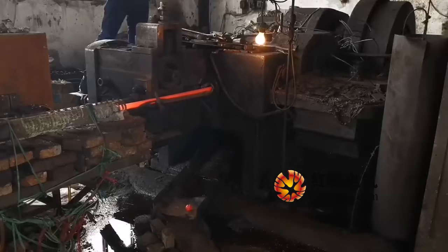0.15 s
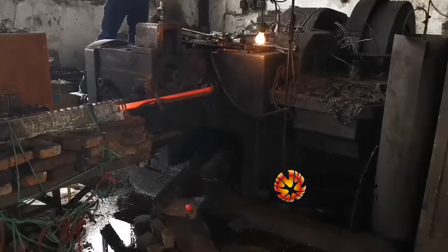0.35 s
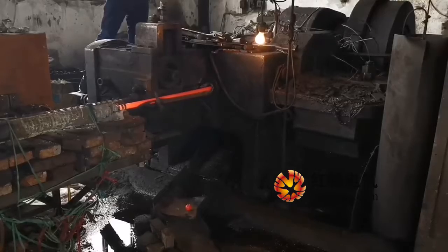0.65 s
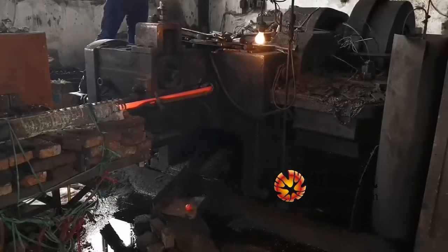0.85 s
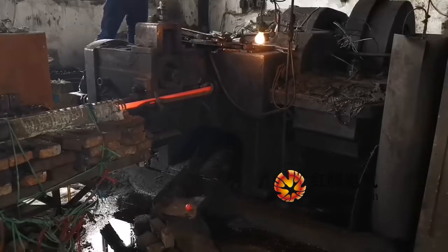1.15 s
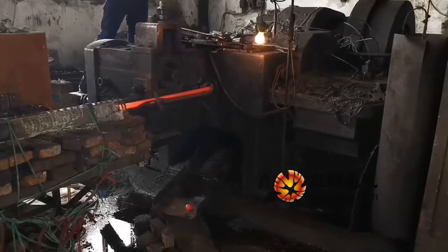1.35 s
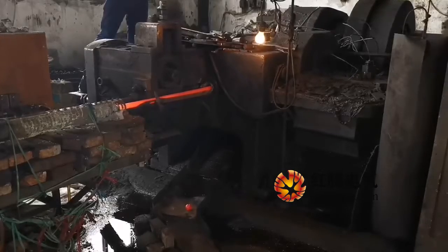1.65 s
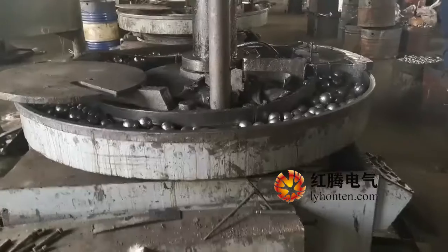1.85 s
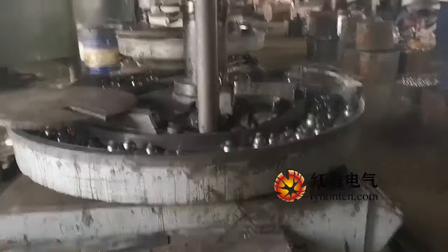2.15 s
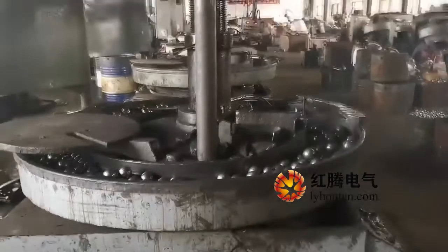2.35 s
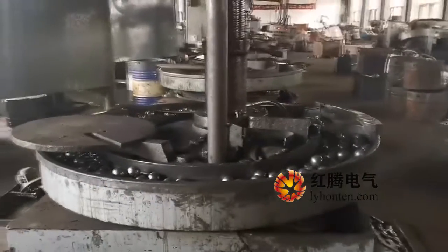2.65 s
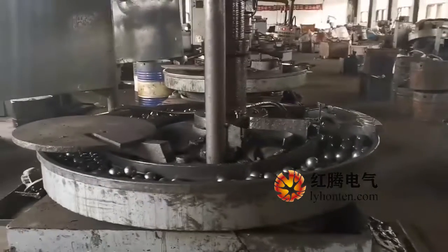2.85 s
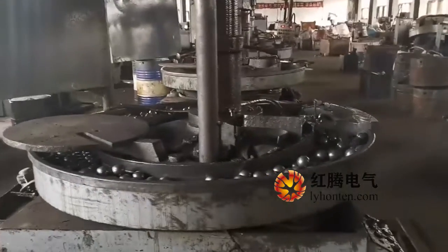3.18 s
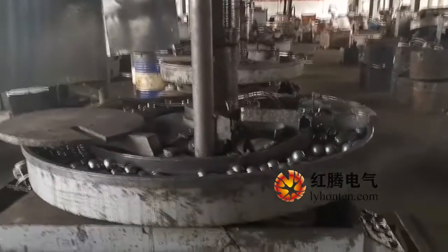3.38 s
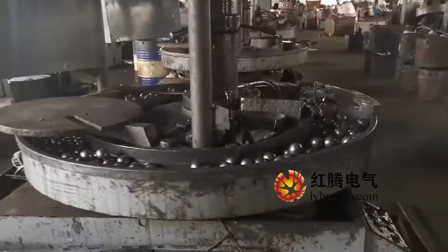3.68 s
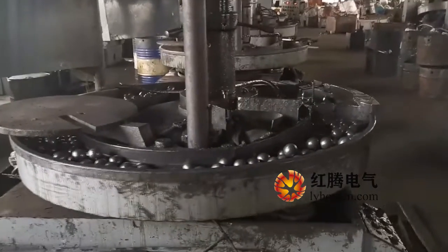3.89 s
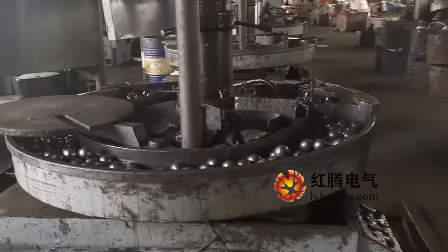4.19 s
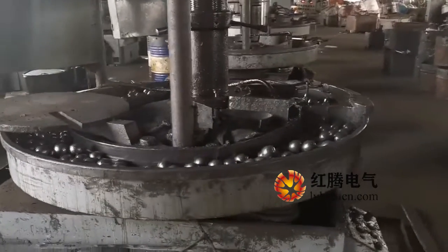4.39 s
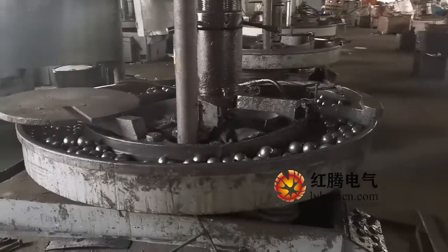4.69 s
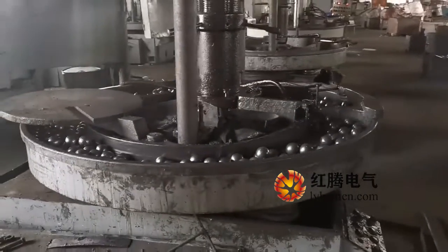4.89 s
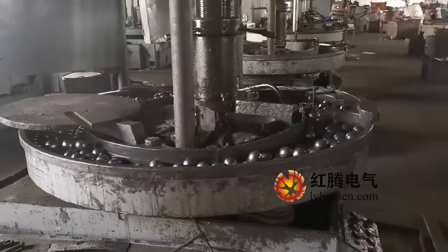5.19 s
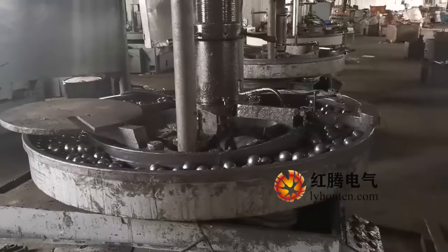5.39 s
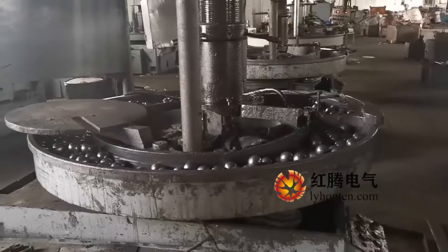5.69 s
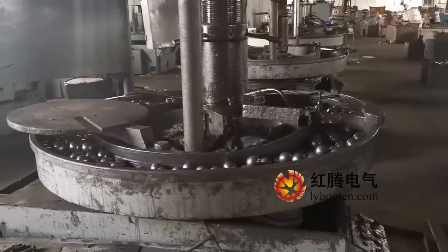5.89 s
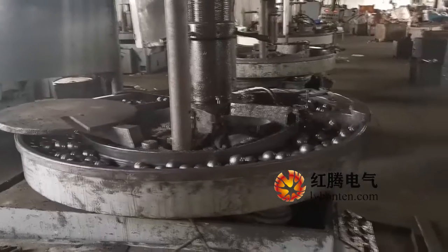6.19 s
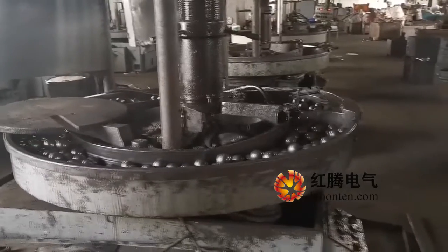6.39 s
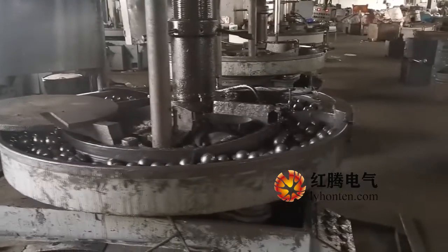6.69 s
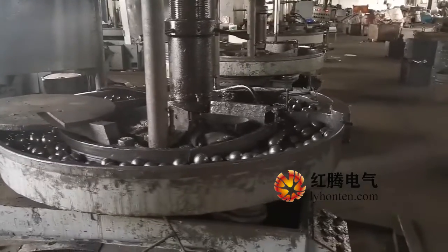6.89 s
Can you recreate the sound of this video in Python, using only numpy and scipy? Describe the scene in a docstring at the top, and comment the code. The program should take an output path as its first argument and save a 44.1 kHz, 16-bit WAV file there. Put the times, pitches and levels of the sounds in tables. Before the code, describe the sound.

In a hard, reverberant factory hall, a heavy rolling mill rumbles and clatters unevenly while hot bar scrapes and briefly squeals and fresh steel balls clank sharply onto a chute. It cuts off to a short silence. Then a ball grinder starts at once, already running: countless steel balls churn, click and knock on an iron pan over a low drive hum. Stereo microphone, fairly close to each machine.

```python
"""Steel-ball works: rolling mill, then ball grinder

Two machines in a hard hall, one after the other with a short silence between, built from random contact
forces that ring coloured, reverberant noise bursts. A skew rolling mill rumbles and clatters on a hot bar,
which scrapes and squeals while fresh balls clank down the chute. Then balls churn in the iron pan of a
grinder over a low drive hum, clicking together, drumming on the floor and knocking on the rim."""
import sys
import numpy as np
from scipy import signal
from scipy.fft import rfft, irfft
from scipy.io import wavfile

SR = 44100
rng = np.random.default_rng(int(sys.argv[2]) if len(sys.argv) > 2 else 0)


def unload_wav(signal):
    """Save mono or channel-first audio to the path in sys.argv[1] as 16-bit WAV at rate SR, clipped to [-1, 1]."""
    wavfile.write(
        sys.argv[1],
        SR,
        np.round(np.clip(np.atleast_2d(signal).T, -1, 1) * 32767).astype(np.int16),
    )


N = 310464

MILL_SPAN, GRINDER_SPAN = (0, 1.825), (2.205, 7.04)  # start and end in seconds
LEAD = SR // 4  # samples for which a machine runs before it is heard
SIZE = 2 ** 15  # samples in the sound of one contact
HZ = np.arange(SIZE // 2 + 1) * SR / SIZE
AGE = np.arange(SIZE) / SR  # seconds since the contact


def undb(db):
    """Decibels to gain."""
    return 10 ** (np.asarray(db) / 20)


def unit(x):
    """Scale to rms 1."""
    return x / np.sqrt(np.mean(x ** 2))


def fade(t60):
    """Envelope that falls 60 dB in t60 seconds."""
    return np.exp(-np.log(1000) * AGE / t60)


def times(span):
    """Sample times in seconds of a machine, from a little before it is heard."""
    return np.arange(round(span[0] * SR) - LEAD, round(span[1] * SR)) / SR


def curve(table, t):
    """A level in dB drawn as straight lines through time."""
    seconds, db = np.transpose(table)
    return np.interp(t, seconds, db)


def effort(table, t):
    """A level curve as dB above its own average."""
    db = curve(table, t)
    return db - db.mean()


def swell(t, start, length, attack, release):
    """Rise in a straight line centred on start, hold, then die away exponentially."""
    rise = np.clip((t - start) / attack + 0.5, 0, 1)
    decay = np.exp(-np.maximum(t - start - length, 0) / release)
    return rise * decay


def rubbing(table, t, attack, release):
    """Level in dB of a run of scrapes or squeals."""
    amplitude = sum(undb(db) * swell(t, start, length, attack, release) for start, length, db in table)
    return 20 * np.log10(1e-9 + amplitude)


def gains(points):
    """(Hz, dB) points as a gain at every frequency."""
    hz, db = np.transpose(points)
    return undb(np.interp(np.log(HZ + 1), np.log(hz), db))


def colour(points):
    """Minimum-phase frequency response through (Hz, dB) points, by folding the cepstrum."""
    cepstrum = irfft(np.log(gains(points)), SIZE)
    cepstrum[1:SIZE // 2] *= 2
    cepstrum[SIZE // 2 + 1:] = 0
    return np.exp(rfft(cepstrum))


def resonances(modes):
    """Frequency response of (Hz, width in Hz, dB) resonances side by side."""
    return sum(undb(db) * 1j * HZ * width / (hz ** 2 - HZ ** 2 + 1j * HZ * width) for hz, width, db in modes)


# A blow is too soft to ring the iron fully in the high treble.
# Each row: frequency in Hz, gain in dB.
SOFT_CONTACT = [(5500, -1.5), (11000, -22.5)]


def detuned(modes, share):
    """Resonances as one place of contact excites them, each off its pitch by a random share."""
    shifts = 1 + share * rng.standard_normal(len(modes))
    shifted = [(hz * shift, width, db) for (hz, width, db), shift in zip(modes, shifts)]
    return gains(SOFT_CONTACT) * resonances(shifted)


def spot_colour(patchy_db=3, step_hz=300):
    """Each place of contact favours a few pitches of its own, less so below 1500 Hz."""
    hz = np.arange(0, SR, step_hz)
    patches = np.clip(rng.standard_normal(len(hz)), -2, 2)
    db = patchy_db * patches * np.minimum(hz / 1500, 1)
    return colour(np.transpose([hz + 1, db]))


def through(x, response):
    """Filter a short sound by a frequency response."""
    return irfft(rfft(x) * response)


def diffuse(spacing_m=0.13, likeness=0.99, sound_speed=343):
    """Noise from all sides at two ports: alike in the bass, nearly unrelated in the treble."""
    alike = likeness * np.sinc(2 * HZ * spacing_m / sound_speed)
    mid, side = through(rng.standard_normal((2, SIZE)), np.sqrt([1 + alike, 1 - alike]))
    return np.array([mid + side, mid - side])


def blow(t60, direct_db, hall_db, lag):
    """One contact: a direct tick (left about lag samples late), the iron's dense ring, the hall's tail."""
    field, ring = diffuse(), fade(t60)
    # the hall decays at 60 dB per second and is also tapered to silence at the end of the sound
    hall = (fade(1) - ring) * (1 - AGE / AGE[-1])
    arrival = 10 + np.array([[1], [-1]]) * (lag + rng.normal(0, 1)) / 2
    tick = unit(np.sinc(AGE * SR - arrival))
    return unit(field * ring) + undb(hall_db) * unit(field * hall) + undb(direct_db) * tick


def contacts(t, rate, spread_db, count=8):
    """Random impulses, rate a second over count spots; spread_db scales their uneven hardness."""
    chance = rng.random((count, len(t)))
    share = rate / count / SR
    spot, when = np.nonzero(chance < share)
    hardness = np.minimum(-np.log(chance[spot, when] / share), 4)
    forces = np.zeros(chance.shape)
    forces[spot, when] = undb(spread_db * hardness) * (-1) ** when
    return forces / np.sqrt(count * np.mean(forces ** 2))


def rattle(forces, db, response, t60, direct_db, hall_db, lag):
    """Contact forces at a moving level ring the iron; one response serves all spots, or one each."""
    gain, out = undb(db), 0
    for force, shape in zip(forces, np.broadcast_to(response, (len(forces), len(HZ)))):
        answer = unit(through(blow(t60, direct_db, hall_db, lag), shape * spot_colour())) / np.sqrt(SIZE)
        out = out + signal.oaconvolve([force * gain], answer, axes=1)[:, :len(force)]
    return out


def ping(hz, t60, scatter=0.03):
    """Two touching balls ring briefly at close pitches, at unrelated phases in the two ports."""
    other_hz = hz * (1 + scatter * rng.standard_normal())

    def ring(pitch):
        return np.sin(2 * np.pi * (pitch * AGE + rng.random((2, 1))))

    onset = 1 - fade(0.0022)
    return (ring(hz) + 0.5 * ring(other_hz)) * fade(t60) * onset


def strikes(table, t, bright, body, modes, t60, direct_db, hall_db, lag, ring_db, clink_t60):
    """Single hard blows: the ball's crack and clink, a lower clack, and the ring of what it hits."""
    out = np.zeros((2, len(t) + SIZE))
    crack_colour, clack_colour = colour(bright), colour(body)
    for seconds, db, body_db, mode_db, clink_hz, clink_db in table:
        responses = np.array([crack_colour, clack_colour, detuned(modes, 0.025)])[:, None]
        parts = through(blow(t60, direct_db, hall_db, lag), responses * spot_colour())
        crack, clack, ring = (part / abs(part).max() for part in parts)
        clink = undb(clink_db) * ping(clink_hz, clink_t60)
        sound = crack + undb(body_db) * clack + undb(mode_db + ring_db) * ring + clink
        start = int((seconds - t[0]) * SR)
        out[:, start:start + SIZE] += undb(db) * sound
    return out[:, :len(t)]


def heard(x, span, lean):
    """Lean a machine left or right by frequency and keep it for its span, with a 128-sample fade-out."""
    ports = irfft([colour([(hz, side * db / 2) for hz, db in lean]) for side in (1, -1)])
    placed = signal.oaconvolve(x, ports, axes=1)[:, LEAD:x.shape[1]]
    closing = np.minimum(np.arange(placed.shape[1])[::-1] / 128, 1)
    return np.pad(placed * closing, ((0, 0), (round(span[0] * SR), N)))[:, :N]


# How hard the rolls work the bar; only the rise and fall about the average counts.
# Each row: time in seconds, level in dB.
MILL_LOAD = [(0.0, -31), (0.166, -39), (0.258, -33), (0.335, -55.5), (0.44, -37), (0.54, -31.5),
             (0.65, -28.5), (0.81, -27.5), (1.0, -34), (1.34, -35), (1.408, -30.5), (1.52, -34),
             (1.67, -28), (1.82, -36.5)]


def mill_load(t):
    """Extra load of the rolls, in dB above the average."""
    return effort(MILL_LOAD, t)


# Resonances of the mill's stand. Each row: frequency in Hz, width in Hz, level in dB.
STAND_MODES = [(144, 25, 3), (269, 13, -20), (383, 24, -7), (850, 21, -2), (1330, 30, -8.5),
               (2580, 46, -13), (5800, 25, -4)]


def mill_stand():
    """The stand passes every force on and adds its own resonances."""
    return 1 + resonances(STAND_MODES)


# Colour of the shaken frame. Each row: frequency in Hz, relative level in dB.
FRAME_COLOUR = [(15, -50), (25, -20.5), (96, -11), (141, -10.5), (189, -8.5), (263, -2.5), (339, -10),
                (408, -9), (600, -21.5), (780, -21.5), (1320, -120)]


def frame_rumble(t, load, stand):
    """Jolts of the rolls shake the heavy frame, whose low rumble follows the load closely."""
    jolts = contacts(t, rate=1000, spread_db=1.0)
    response = colour(FRAME_COLOUR) * stand
    return rattle(jolts, -32.5 + 0.85 * load, response, t60=0.0684, direct_db=-2.5, hall_db=-3, lag=-0.23)


# Colour of the rolls, also the lower clack of a ball on the chute.
# Each row: frequency in Hz, relative level in dB.
ROLLS_COLOUR = [(290, -28), (500, -8), (726, -6), (912, -8.5), (1740, -9), (2870, -11), (4400, -21),
                (5720, -53.5), (9680, -120)]


def roll_clatter(bites, load, stand):
    """The rolls bite the bar and clatter in the middle range, only gently louder under load."""
    response = colour(ROLLS_COLOUR) * stand
    return rattle(bites, -31 + 0.23 * load, response, t60=0.1, direct_db=-17, hall_db=-0.5, lag=-0.5)


# Bright colour of the steel, in the scrapes and in the crack of a ball on the chute.
# Each row: frequency in Hz, relative level in dB.
STEEL_COLOUR = [(2350, -6.5), (4000, -11.5), (4230, -17), (4750, 2.5), (5450, 1), (6580, -3.5), (7940, 2.5),
                (9020, -6.5), (10000, -17.5), (11600, -20), (12700, -30.5), (13900, -29.5), (15000, -48.5)]
# The bar catches in its guide. Each row: start in seconds, length in seconds, level in dB.
SCRAPES = [(0.0, 0.13, -36.5), (0.249, 0.024, -30), (0.318, 0.016, -41.5), (0.553, 0.061, -35.5),
           (0.65, 0.082, -37), (0.893, .04, -38), (1.098, 0.034, -35.5), (1.232, 0.009, -29),
           (1.387, 0.13, -33), (1.546, .02, -37), (1.73, 0.041, -36.5)]


def guide_scrape(t, bites, load, stand):
    """The bar grates in its guide at a nearly steady low level and catches in scrapes."""
    guide_db = -40.5 + 0.093 * load
    db = np.maximum(guide_db, rubbing(SCRAPES, t, attack=0.0081, release=0.037))
    response = colour(STEEL_COLOUR) * stand
    return rattle(bites, db, response, t60=0.045, direct_db=-5.0, hall_db=-14.0, lag=-0.55)


# Balls dropping on the chute. Each row: start in seconds, crack level in dB before a common gain, then
# clack in dB and chute ring in dB against the crack (the ring before a common trim),
# clink pitch in Hz, clink in dB against the crack's peak.
CLANKS = [(0.0024, -23.5, 3, -2.5, 7550, -22), (0.09, -28.5, 5, 3.5, 7450, -18),
          (0.1659, -25.5, -16, -23.5, 8300, -9), (0.2542, -24, -11, -3, 7600, -14),
          (0.274, -25, -16, -4, 7980, -4), (0.3252, -27, -10, -13, 7600, -12),
          (0.4048, -20.5, -8, -20, 7655, -20.5), (0.4085, -22.5, -9, -25, 7520, -14),
          (0.6, -33.5, 10, 3, 7700, -16), (0.627, -33, 8, 1, 7700, -16), (0.6363, -20, -11, -22, 7800, -13),
          (0.672, -28, -10, -24, 5650, -3), (0.9244, -35.5, 15, 3, 7700, -10),
          (0.9889, -27, -11.5, -24, 8200, -7), (1.0973, -25.5, 1, -14, 7750, -8),
          (1.2307, -22, -7.5, -10, 8100, -9), (1.238, -25, 1.5, -7.5, 7740, -6),
          (1.291, -25, -3.5, -27, 7740, -9.5), (1.3585, -30, 1.5, -24.5, 7700, -18),
          (1.405, -29, 6.5, -13.5, 8040, -10.5), (1.473, -29.5, 0, -10, 5200, -3),
          (1.69, -31.5, -7, -17.5, 8300, -8), (1.739, -27.5, 7, -11, 5100, -6),
          (1.7715, -22, -17, -22.5, 7500, -11), (1.8102, -37, -6, -12.5, 8100, 5.5)]
# Resonances of the chute. Each row: frequency in Hz, width in Hz, level in dB.
CHUTE_MODES = [(2090, 31, -0.5), (2460, 65, 0), (2770, 140, 6), (3320, 50, -2), (3480, 42, -1.5),
               (5770, 16, -9.5), (6700, 20, -18.5)]


def chute_clanks(t):
    """Finished balls hit the chute with a short, hard tick, and the chute rings."""
    return undb(5) * strikes(CLANKS, t, STEEL_COLOUR, ROLLS_COLOUR, CHUTE_MODES, t60=0.055, direct_db=-9,
                             hall_db=-2.5, lag=-0.41, ring_db=1, clink_t60=0.06)


# The bar slips between the rolls. Each row: start in seconds, length in seconds, level in dB.
SQUEALS = [(0.005, .03, -29), (.085, .04, -50), (.266, 0.017, -30.5), (.322, 0.023, -32),
           (.36, 0.031, -46.5)]
# What the squeal rings with. Each row: frequency in Hz, width in Hz, level in dB.
SQUEAL_MODES = [(2230, 45, -1), (2530, 61, 2.5), (2760, 50, -1.5), (2845, 67, 1), (3130, 90, -6),
                (3660, 40, -11), (4620, 31, -5), (5800, 37, -3)]


def bar_squeal(t, bites):
    """The slipping bar squeals: the bites of the rolls excite a cluster of resonances."""
    db = rubbing(SQUEALS, t, attack=0.007, release=0.034)
    return rattle(bites, db, resonances(SQUEAL_MODES), t60=0.069, direct_db=-3, hall_db=1, lag=-0.55)


# Stereo lean of the mill. Each row: frequency in Hz, left minus right in dB.
MILL_LEAN = [(60, 4), (110, 3.5), (200, 2.5), (370, 4), (690, 3), (1270, 6), (2340, 0), (4320, 3.5),
             (7950, 2.5), (14600, -3)]


def mill():
    """The rolls bite the bar and shake the frame; the bar scrapes and squeals; balls hit the chute."""
    t = times(MILL_SPAN)
    load, stand = mill_load(t), mill_stand()
    bites = contacts(t, rate=1400, spread_db=0.5)
    machine = frame_rumble(t, load, stand) + roll_clatter(bites, load, stand)
    bar = guide_scrape(t, bites, load, stand) + bar_squeal(t, bites)
    return heard(machine + bar + chute_clanks(t), MILL_SPAN, MILL_LEAN)


# How briskly the balls circulate; only the rise and fall about the average counts.
# Each row: time in seconds, level in dB.
CHURN = [(2.21, -29.5), (2.33, -32.5), (2.52, -33.5), (2.63, -36), (2.77, -34), (3.0, -36), (3.5, -32),
         (3.75, -33.5), (4.35, -30), (5.5, -29.5), (5.7, -32), (5.95, -31), (6.5, -33), (7.03, -30)]


def briskness(t):
    """Extra churning of the balls, in dB above the average."""
    return effort(CHURN, t)


# The balls bunch up and shove along the wall; each part of the grinder scales the rise in its own way.
# Each row: start in seconds, length in seconds, unscaled rise in dB.
SURGES = [(2.425, .05, 0), (3.434, 0.13, 3), (3.553, 0.048, 3), (3.995, 0.013, 6), (4.316, 0.044, 2),
          (4.492, 0.06, 2.5), (4.593, 0.06, 3.5), (5.228, 0.029, 3), (5.544, 0.064, 2), (5.817, 0.061, 3),
          (5.945, 0.049, 4), (6.016, 0.022, 3), (6.313, 0.034, 3.5), (6.407, 0.015, 2.5), (6.54, 0.02, 4.5),
          (6.619, 0.029, 6)]


def bunching(t, slack_share=0.3, slack_s=0.081):
    """Rise in dB before scaling: each surge pushes up, then the balls lie loose and quieter."""
    attack, release = 0.0044, 0.0087  # seconds
    rise = 0
    for start, length, db in SURGES:
        push = swell(t, start, length, attack, release)
        slack = swell(t, start + length + release, slack_s, attack, release)
        rise = rise + db * (push - slack_share * slack)
    return rise


# Resonances of the grinder's pan. Each row: frequency in Hz, width in Hz, level in dB.
PAN_MODES = [(151, 21, -9), (194, 16, -11), (253, 24, -7), (946, 110, -6), (1350, 44, -3), (3560, 59, -6),
             (4204, 20, 6.5), (6300, 22, -1), (7440, 96, -6), (8040, 60, -12)]


def pan_iron():
    """The pan passes every force on and adds its own resonances."""
    return 1 + resonances(PAN_MODES)


def wall_iron(spots):
    """The same pan touched along its wall, slightly detuned at each spot."""
    return 1 + np.array([detuned(PAN_MODES, 0.012) for _ in range(spots)])


# Level of the drive under the pan. Each row: time in seconds, level in dB.
DRIVE_LEVEL = [(2.21, -49), (2.61, -55), (3.61, -47), (3.75, -63), (3.94, -45), (5.3, -46.5), (5.34, -54),
               (7.03, -46.5)]
# Colour of its hum. Each row: frequency in Hz, relative level in dB.
DRIVE_COLOUR = [(15, -24), (25, -27.5), (75, 3), (112, -4.5), (130, -1.5), (170, -24), (290, -120)]


def drive_hum(t, bumps):
    """Dense bumps through a low, narrow colour blur into the hum of the drive."""
    return rattle(bumps, curve(DRIVE_LEVEL, t), colour(DRIVE_COLOUR), t60=0.15, direct_db=3.0, hall_db=1.0,
                  lag=4)


# Colour of the pan's base. Each row: frequency in Hz, relative level in dB.
BASE_COLOUR = [(65, -48.5), (110, -13.5), (194, -8), (221, -5), (252, -4), (328, -3), (403, -4.5),
               (499, -6.5), (600, -28), (780, -42), (1320, -120)]


def base_rumble(bumps, brisk, surge_db, pan):
    """Balls bump the base of the pan, which rumbles and feels only part of each surge."""
    db = -36 + 0.6 * brisk + 0.32 * surge_db
    return rattle(bumps, db, colour(BASE_COLOUR) * pan, t60=0.052, direct_db=1.5, hall_db=-3, lag=7.7)


# Level of the floor's drumming. Each row: time in seconds, level in dB.
DRUMMING = [(2.21, -42), (2.55, -47), (2.65, -44), (3.05, -49), (3.44, -36), (3.8, -44), (4.05, -34),
            (4.35, -39), (4.55, -36), (5.2, -38), (5.45, -44), (5.95, -34), (6.1, -42), (7.03, -39)]
# Resonances of the pan's floor. Each row: frequency in Hz, width in Hz, level in dB.
FLOOR_MODES = [(369, 31, 1.5), (407.4, 41, 5.5), (483, 15, -5.5)]


def floor_drumming(t):
    """The floor of the pan drums on a few low resonances under the rolling balls."""
    thuds = contacts(t, rate=300, spread_db=0.0, count=5)
    return rattle(thuds, curve(DRUMMING, t), resonances(FLOOR_MODES), t60=0.078, direct_db=1, hall_db=-7.5,
                  lag=8.8)


# Colour of the pan's wall. Each row: frequency in Hz, relative level in dB.
WALL_COLOUR = [(290, -24), (500, -2.5), (589, -6.5), (848, -5.5), (1010, -4.5), (1240, -7), (1800, -5),
               (2260, -13.5), (2480, -12.5), (2790, -14), (3400, -18), (4300, -16), (5720, -20.5),
               (9680, -120)]


def wall_churn(touches, brisk, surge_db, wall):
    """Jostling balls clack in the wall of the pan."""
    db = -29.5 + 0.53 * brisk + 0.81 * surge_db
    return rattle(touches, db, colour(WALL_COLOUR) * wall, t60=0.11, direct_db=-4.0, hall_db=-5.5, lag=2.6)


# Colour of the wall's upper ring. Each row: frequency in Hz, relative level in dB.
UPPER_RING_COLOUR = [(900, -46), (1700, -12.5), (2250, -7), (2500, -5), (2900, -2), (3300, -7),
                     (3600, -7.5), (4000, -9), (4400, -15), (5720, -15.5), (9680, -120)]


def upper_ring_clang(sparse_touches, brisk, surge_db, wall):
    """Sparser touches make the upper ring of the wall clang."""
    db = -33.5 + 0.87 * brisk + surge_db
    return rattle(sparse_touches, db, colour(UPPER_RING_COLOUR) * wall, t60=0.05, direct_db=-0.5,
                  hall_db=-0.5, lag=5.4)


# Short rings of the grooved plate that the balls run on.
# Each row: frequency in Hz, width in Hz, level in dB.
PLATE_MODES = [(2113, 61, 6), (2267, 29, 8.5), (2758, 47, 3), (2870, 44, -6), (3247, 25, 6)]


def plate_clang(sparse_touches, brisk, surge_db):
    """Sparser touches ring the grooved plate, detuned from spot to spot."""
    db = -36.5 + 1.3 * brisk + surge_db
    grooves = np.array([detuned(PLATE_MODES, 0.035) for _ in sparse_touches])
    return rattle(sparse_touches, db, grooves, t60=0.055, direct_db=1.5, hall_db=-3.5, lag=3.0)


# Bright colour of the balls, in their clicks and in the crack of a knock.
# Each row: frequency in Hz, relative level in dB.
BALLS_COLOUR = [(2350, -25), (4000, -16), (4750, -6.5), (5600, -3), (6470, -4), (7030, -2.5), (7770, 2),
                (9270, -9), (10200, -27.5), (13700, -37), (15000, -47)]


def ball_clicks(t, touches, brisk, surge_db, pan):
    """Balls click against each other, swelling most in a surge; the clicking slowly grows fainter."""
    fading_db = -0.5 * (t - t.mean())  # half a dB a second
    db = -38.5 + 0.57 * brisk + 1.26 * surge_db + fading_db
    return rattle(touches, db, colour(BALLS_COLOUR) * pan, t60=0.05, direct_db=-3.5, hall_db=-6.5, lag=11.9)


# The hardest knocks of the balls. Each row: start in seconds, crack level in dB before a common gain, then
# clack in dB and rim ring in dB against the crack (the ring before a common trim),
# clink pitch in Hz, clink in dB against the crack's peak.
KNOCKS = [(2.206, -18, 3.5, 10, 7340, -12), (2.2235, -16, 1, 8.5, 7270, -9), (2.24, -25, -7, 14, 7500, -15),
          (2.271, -20, 8, -5, 7600, -12), (2.2824, -15.5, -6, 0, 7700, -20),
          (2.328, -36, -6, 12, 7400, -10), (2.345, -27.5, -5, 19.5, 7500, -12),
          (2.3644, -28.5, -4, 17, 7540, -6), (2.4272, -20.5, 5, -6, 8300, -8),
          (2.46, -23, 3, -3, 7750, -13), (2.675, -35, 0, -8, 7600, -12), (2.724, -40, 3, -8, 7600, -15),
          (2.925, -19, -5, -10, 7700, -13), (2.963, -21, -12, -16, 7640, -14), (3.0, -32, 9, -8, 7700, -13),
          (3.447, -26.5, 9, 12, 7600, -10), (3.4678, -24, -9, 13, 7860, -8),
          (3.5701, -21, -1, -14, 7650, -14), (3.6, -12, 0, -21, 7960, -11), (3.6223, -24, 9, -14, 7935, -9),
          (3.7013, -13, -6, -22, 7500, -15), (3.778, -24, 2, -10, 7600, -10),
          (4.004, -25, 5, -2, 7600, -18), (4.013, -25, 11, -1, 7500, -12), (4.064, -23, 6, -3, 7600, -10),
          (4.1208, -23, -3, 0, 7900, -3), (4.1831, -24, -6, -8, 7450, -2), (4.309, -35, 6, 0, 7600, -10),
          (4.3428, -24, -1, -7, 7660, -6), (4.4115, -16, 1, 0, 7800, -11), (4.481, -17, -8, -19, 7800, -15),
          (4.607, -25, 7, 1, 7500, -14), (4.7175, -18, 4.5, -18, 8100, -8), (4.778, -18, 7, -6, 7700, -20),
          (4.805, -15, -15, -23, 7500, -19), (4.9618, -21, -12, -10, 7540, -4),
          (5.079, -21, 9, -3, 7730, -14), (5.1953, -21.5, 14, -12, 7500, -7),
          (5.238, -18, 7, -20, 7590, -9), (5.2737, -17, 7, -22, 7480, -8),
          (5.3281, -18.5, -10, -12, 7400, -10), (5.398, -29, 4, -5, 7600, -10),
          (5.592, -21, -2, -14, 7840, -3), (5.634, -18, -6, -15, 7635, -3), (5.844, -25, 9, -8, 7540, -10),
          (6.0109, -15.5, -5, -18, 7500, -11), (6.029, -17, 7, -12, 7900, -10),
          (6.046, -25, -10, -20, 8400, 1.5), (6.1145, -17.5, 8, -24, 7500, -13),
          (6.1444, -23, 0, -17, 7900, -4), (6.207, -27, 6, -8, 7600, -8), (6.232, -23, -6, -15, 8000, -6),
          (6.274, -26, 9, 0, 7600, -14), (6.294, -21, 7, -9, 8100, -12), (6.3513, -23, 8, -11, 7700, -14),
          (6.365, -16.5, 4, -16, 7240, -13), (6.4404, -20.5, 9, -14, 7740, -2),
          (6.463, -16, -2, -23, 7420, -17), (6.516, -34, 10, -8, 7500, -12),
          (6.599, -22, 2, -20, 8350, -13), (6.643, -19, 8, -2, 7700, -17), (6.654, -16, 0, -5, 7500, -12),
          (7.03, -20.5, 14, -20, 7600, -12)]
# Colour of the lower clack. Each row: frequency in Hz, relative level in dB.
CLACK_COLOUR = [(290, -23), (550, -12), (1000, -5), (1800, -6.5), (2250, -1.5), (2500, -6), (2820, 4),
                (3250, -7.5), (3700, -4), (5720, -20.5), (9680, -120)]
# What a knock rings in the rim. Each row: frequency in Hz, width in Hz, level in dB.
RIM_MODES = [(610, 42, 16.5), (730, 79, 15), (790, 94, 13), (1006, 80, 17.5), (1120, 42, -20),
             (3600, 34, -12)]


def rim_knocks(t):
    """Single balls knock hard on the rim, which rings."""
    return undb(-3.5) * strikes(KNOCKS, t, BALLS_COLOUR, CLACK_COLOUR, RIM_MODES, t60=0.062, direct_db=-11.0,
                                hall_db=-4.0, lag=7.5, ring_db=-5.5, clink_t60=0.059)


# Stereo lean of the grinder. Each row: frequency in Hz, left minus right in dB.
GRINDER_LEAN = [(60, -3.5), (110, 2.5), (200, -3), (370, 1), (690, 0), (1270, 3), (2340, 0.5), (4320, 1.5),
                (7950, -2.5), (14600, -3.5)]


def grinder():
    """Balls roll and jostle: the same touches sound in balls and wall, sparser separate ones clang."""
    t = times(GRINDER_SPAN)
    brisk, surge_db = briskness(t), bunching(t)
    bumps = contacts(t, rate=1100, spread_db=-1.0, count=6)
    touches = contacts(t, rate=700, spread_db=2.5, count=10)
    sparse_touches = contacts(t, rate=260, spread_db=2.0, count=10)
    pan, wall = pan_iron(), wall_iron(len(touches))
    low = drive_hum(t, bumps) + base_rumble(bumps, brisk, surge_db, pan) + floor_drumming(t)
    churn = wall_churn(touches, brisk, surge_db, wall)
    ring_clang = upper_ring_clang(sparse_touches, brisk, surge_db, wall)
    clang = ring_clang + plate_clang(sparse_touches, brisk, surge_db)
    clicks = ball_clicks(t, touches, brisk, surge_db, pan)
    return heard(low + churn + clang + clicks + rim_knocks(t), GRINDER_SPAN, GRINDER_LEAN)


def scene():
    """First the mill, then the grinder."""
    return mill() + grinder()


def record(dry):
    """A steep low-pass ends the treble just below 15 kHz."""
    return signal.sosfilt(signal.ellip(10, 0.2, 80, 14950, fs=SR, output="sos"), dry)


dry = scene()
out = record(dry)
unload_wav(out)
```